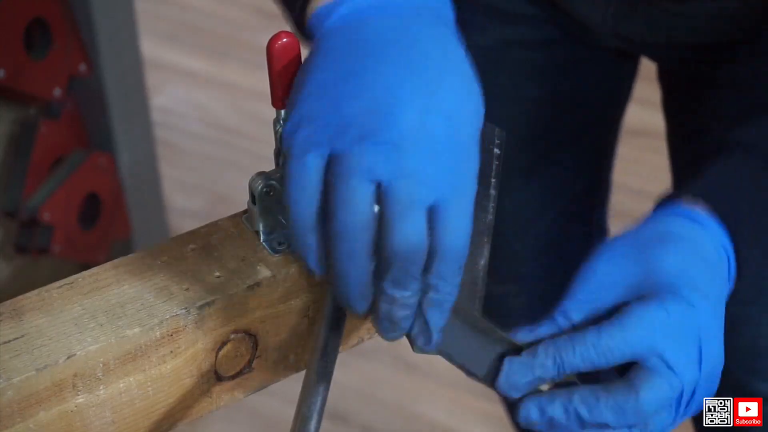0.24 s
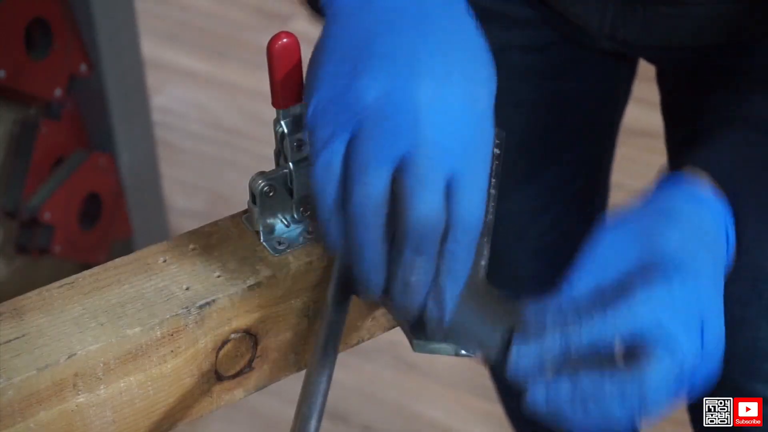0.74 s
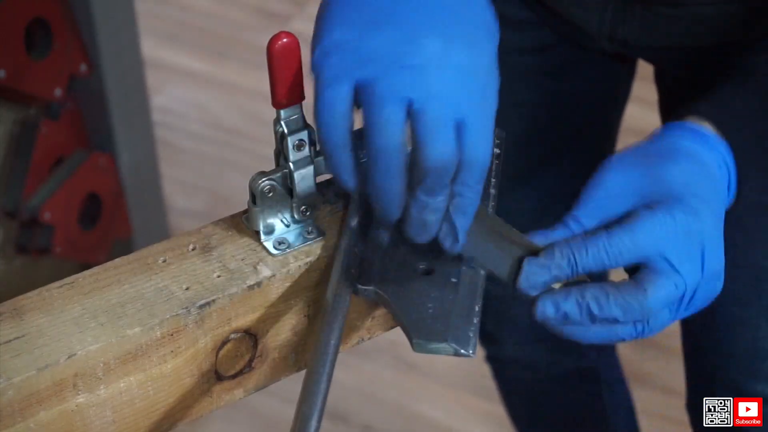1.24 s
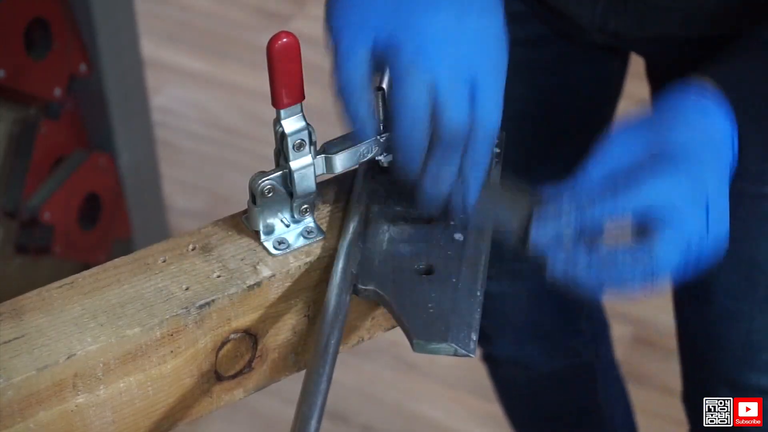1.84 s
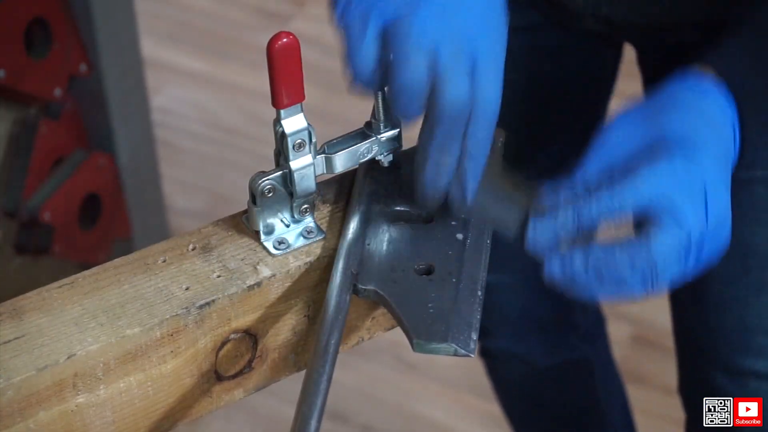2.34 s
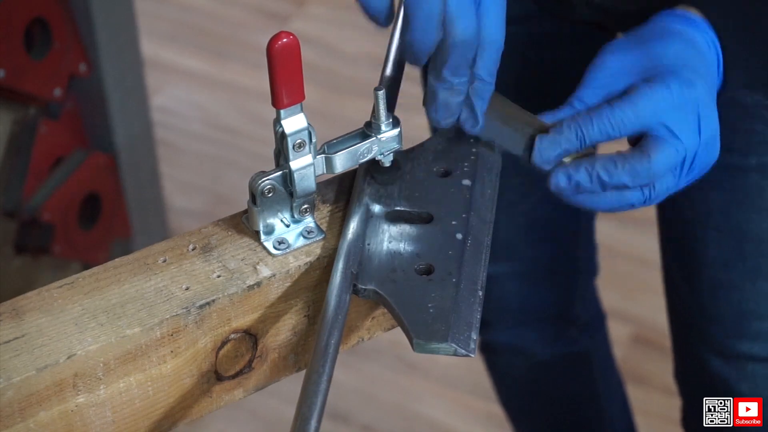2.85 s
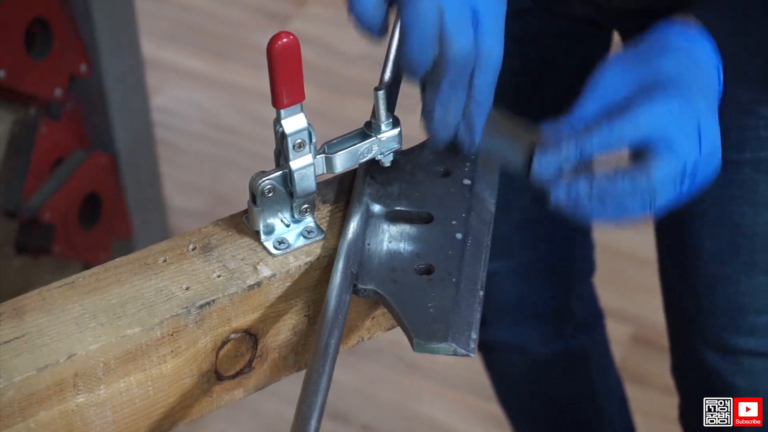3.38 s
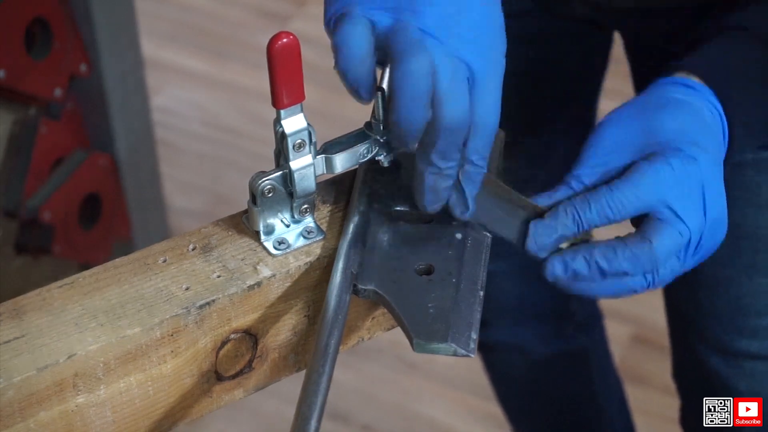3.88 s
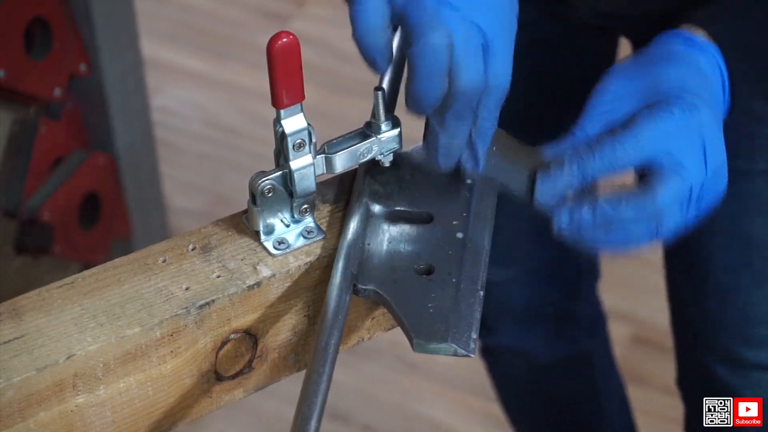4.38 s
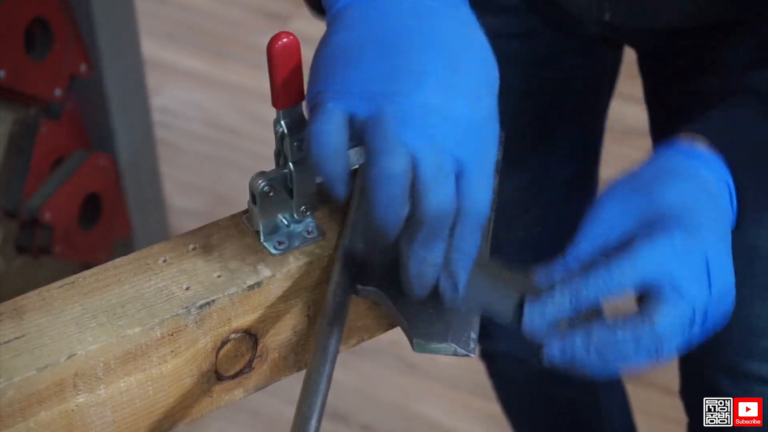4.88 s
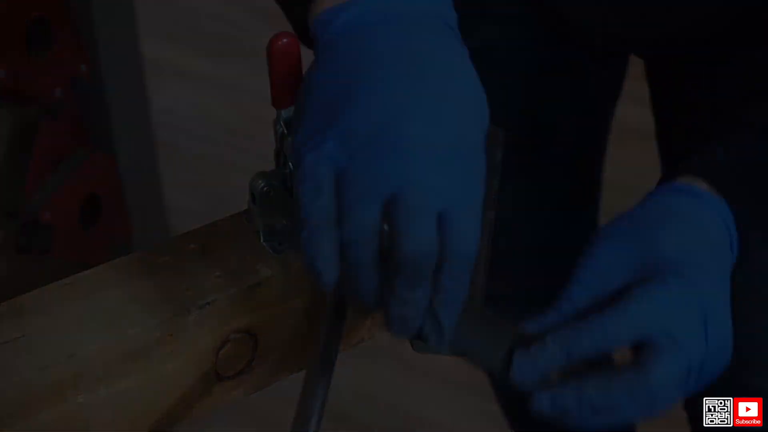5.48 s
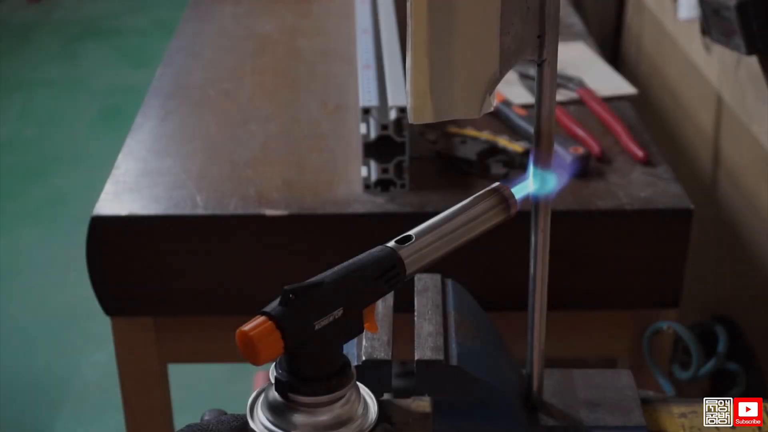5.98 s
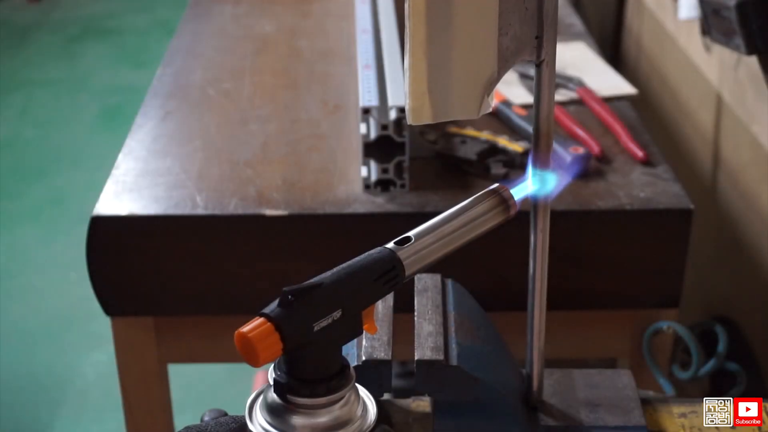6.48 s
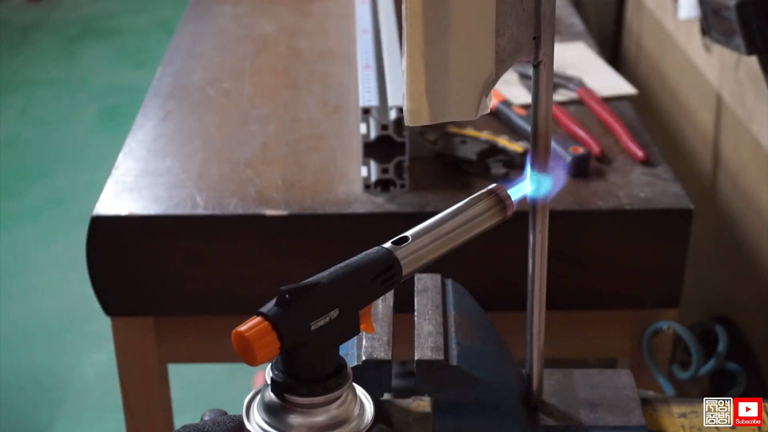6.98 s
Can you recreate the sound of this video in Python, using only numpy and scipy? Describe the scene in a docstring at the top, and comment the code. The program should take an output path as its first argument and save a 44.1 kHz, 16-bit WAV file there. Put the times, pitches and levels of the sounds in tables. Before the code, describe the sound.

In a quiet workshop, a stereo microphone picks up quick, even strokes of steel wool on clamped steel: a bright, scratchy fizz with a metallic ring, dipping at each turn of the hand. A few brief squeaks slip out while the wooden beam underneath drones faintly. Near the end this blends into another room, where a gas torch burns with a steady, slightly hollow roar.

```python
"""A fizzing, ringing scrub comes first: steel wool worked to and fro on a steel rod clamped to a wooden
beam, heard on a two-port stereo microphone in a quiet workshop. Snagging fibres fizz, ring the steel and
now and then squeak; each stroke falls away where the hand turns, and the beam drones underneath.
Near the end the workshop crossfades to another room, where a gas torch roars through the resonances."""
import sys
import numpy as np
from scipy import signal
from scipy.fft import rfft, irfft, next_fast_len
from scipy.io import wavfile
from scipy.ndimage import uniform_filter1d

SR = 44100
rng = np.random.default_rng(int(sys.argv[2]) if len(sys.argv) > 2 else 0)


def persist_wave(psi):
    """Save psi, clipped to +-1, as 16-bit WAV."""
    counts = np.round(np.clip(psi, -1, 1) * 32767).astype(np.int16)
    wavfile.write(sys.argv[1], SR, np.atleast_2d(counts).T)


N = 318830
PADDED = next_fast_len(N)


def gain_of(db):
    """Decibels to gain."""
    return 10 ** (np.asarray(db) / 20)


def unit_rms(x):
    """Scales to rms 1."""
    return x / np.sqrt(np.mean(x ** 2) + 1e-20)


def over_time(points):
    """A curve, sample by sample."""
    t, value = np.transpose(points)
    return np.interp(np.arange(N) / SR, t, value)


def over_hz(points):
    """Each column of a table, bin by bin, straight on a log axis."""
    f, *columns = np.transpose(points)
    log_bins = np.log(np.fft.rfftfreq(PADDED, 1 / SR) + 1)
    return [np.interp(log_bins, np.log(f + 1), column) for column in columns]


def colour(x, db):
    """Filters by a level in dB for each bin."""
    return irfft(rfft(x, PADDED) * gain_of(db), PADDED)[:, :N]


def wander(seconds):
    """Slow random drift of rms 1, shared by left and right."""
    size = max(round(seconds * SR), 2)
    return unit_rms(uniform_filter1d(uniform_filter1d(rng.standard_normal(N), size), size))


def resonate(x, hz, width_hz):
    """A resonance that follows the curve hz: shifts it down to zero, smooths, and shifts back."""
    carrier = np.exp(2j * np.pi * np.cumsum(hz) / SR)
    pole = np.exp(-np.pi * width_hz / SR)
    return 2 * (carrier * signal.lfilter([1 - pole], [1, -pole], x / carrier)).real


def microphone(pair, image):
    """Blends two unrelated versions of a sound into the left and right microphone ports."""
    likeness, lead, balance_db = over_hz(image)
    likeness = np.clip(likeness, 0, 1)
    left, other = rfft(pair, PADDED)
    right = (likeness * left + np.sqrt(1 - likeness ** 2) * other) * np.exp(-1j * lead)
    spectra = np.array([left * gain_of(balance_db / 2), right * gain_of(-balance_db / 2)])
    return irfft(spectra, PADDED)[:, :N]


def reflections(x, depth_db):
    """Reflections off hands, beam and walls cut a fine comb that shifts as the pad travels."""
    frames = signal.stft(x, nperseg=2048)[2]
    comb = uniform_filter1d(rng.standard_normal(frames.shape[1:]), size=2, axis=0)
    comb = unit_rms(uniform_filter1d(comb, size=5, axis=1))
    return unit_rms(signal.istft(frames * gain_of(depth_db * comb), nperseg=2048)[1][:, :N])


def snags(per_s, spread_db):
    """Fibres catch and let go: dense clicks of either sign, a few of them large."""
    chance, size, sign = rng.random((3, 2, N))
    size_db = spread_db * np.minimum(-np.log(size + 1e-9), 5)
    return unit_rms((chance < per_s / SR) * gain_of(size_db) * np.sign(sign - .5))


# strokes on the rod: start t/s, base level/dB, swell from middle to end/dB, ring over fizz/dB
STROKES = [(-0.1, -42, 1, -5), (0.039, -42.5, 0.5, -3), (0.186, -44, -0.5, -4), (0.33, -42, 0, -3),
           (0.469, -45.5, 1.5, -3.5), (0.609, -42, -0.5, -4.0), (0.743, -47.5, 1, -1.5),
           (0.883, -45, -1.5, -4), (1.023, -47, 2, -1), (1.16, -43.0, 1.5, -2.0), (1.327, -44.0, -2.5, -2),
           (1.471, -40.0, 2, -3.5), (1.642, -40.0, -3, -3.5), (1.792, -39.5, 0.5, -2),
           (1.976, -40.5, -1, -2), (2.124, -42, 0, 1.0), (2.311, -41.0, -2, 1), (2.461, -41.5, -1.5, 2),
           (2.627, -42.0, -0.5, 0.5), (2.769, -43.5, 1.5, 0.0), (2.926, -43, -2, 2),
           (3.063, -43.5, 2.5, 4.5), (3.211, -42.5, -2, 0.0), (3.352, -44.0, 1.5, 3.0),
           (3.502, -42, -2, 0.0), (3.642, -43.5, 2.0, 3.5), (3.791, -42.5, -0.5, 0.5), (3.95, -44, 0.5, 1),
           (4.104, -42.5, 0.5, 0), (4.267, -39, -0.5, 2), (4.417, -42.5, -0.5, -0.5),
           (4.588, -39.5, 1, 1.5), (4.739, -41.5, -3, -1.5), (4.914, -40.0, 1, -1), (5.065, -43.0, -2, -1),
           (5.238, -43, 1.5, -1.5), (5.388, -44.0, -2.5, -1), (5.542, -44.5, 1.0, -1.5),
           (5.687, -44.5, -1.5, -1), (5.847, -42.5, -2, -2)]
# fizz of fibres on steel: f/Hz, relative level/dB
FIZZ_SPECTRUM = [(60, -85), (300, -55), (1400, -20), (2000, -21), (2700, -15.5), (3400, -7.5), (4100, -2.5),
                 (4600, -11.5), (6800, -4.5), (8400, 2.5), (9300, 1), (10700, 3.5), (12000, -5)]
# centre of the ring as the grip moves along the rod: t/s, f/Hz
RING_CENTRE = [(0, 5250), (.5, 5000), (1.0, 5000), (1.4, 5360), (1.9, 5450), (2.15, 5850), (2.45, 5100),
               (2.8, 5150), (3.3, 5350), (3.75, 5200), (4.0, 5500), (4.3, 5800), (4.9, 5600), (5.4, 5260),
               (6.0, 5040)]
# how firmly the rod drives the plate: t/s, level/dB relative to the stroke
PLATE_DRIVE = [(0, -9.5), (1.0, -7.5), (1.6, -10), (2.3, -8.5), (3.0, -11), (4.0, -14.5), (4.4, -9),
               (5.0, -12.5), (6.0, -15)]
# the workshop at the microphone: f/Hz, left-right likeness, left lead/rad, left over right/dB
WORKSHOP_IMAGE = [(98, 1, 0.87, 2.5), (595, 0.72, -0.41, 1), (1390, 0.37, -0.8, 1.5), (2450, 0.44, -0.5, 2),
                  (3540, 0.19, 0.047, 1.5), (4400, 0.51, 0.023, 0), (5420, 0.79, 0.1, 3.5),
                  (6000, 0.8, -1.3, 5), (6560, 0.54, -0.085, 1), (8500, 0.69, -0.29, 1),
                  (11000, 0.93, -0.7, 2)]
def scrub():
    """Snags follow the hand's speed; they fizz and ring the steel in a band that moves with the grip."""
    last_turn_s, glide_hz = 6.0, 250
    starts, level_db, swell_db, ring_over_db = np.transpose(STROKES)
    turns, t = np.append(starts, last_turn_s), np.arange(N) / SR
    progress = np.interp(t, turns, np.arange(len(turns)))  # stroke count; fraction = way along it
    stroke = np.minimum(progress.astype(int), len(starts) - 1)
    along = 2 * (progress - stroke) - 1  # from -1 at one turn to 1 at the next
    arch = 1 - 2 * abs(along)
    press_db = uniform_filter1d(level_db[stroke], size=600)
    # the fizz sags along a stroke and arches in its middle; the ring swells more and dips there
    fizz_db = press_db + (swell_db[stroke] - 0.5) * along + 0.5 * arch
    ring_db = press_db + ring_over_db[stroke] + 1.33 * swell_db[stroke] * along - arch
    fizz_gain, ring_gain = uniform_filter1d(gain_of([fizz_db, ring_db]), size=400)
    ring_hz = over_time(RING_CENTRE) - glide_hz / 2 * along * (-1) ** stroke  # down one way, up the other
    # the pad bites quickly after a turn and slows more gently into the next
    since, until = t - turns[stroke], abs(turns[stroke + 1] - t)
    speed = 0.34 + np.tanh(since / 0.029) * np.tanh(until / 0.033)  # the floor stands for echoes
    bite = (np.tanh(since / 0.012) * np.tanh(until / 0.02)) ** 2
    fizz = colour(snags(per_s=14000, spread_db=2.3), over_hz(FIZZ_SPECTRUM)[0])
    fizz = reflections(fizz, depth_db=4.3) * fizz_gain * speed
    ring = resonate(snags(per_s=9000, spread_db=2.7), ring_hz, width_hz=2120)
    ring = reflections(resonate(ring, ring_hz, width_hz=2100), depth_db=3.3) * ring_gain
    ring = colour(ring, over_hz([(1500, -45), (3300, -3.0), (4000, -1)])[0])  # steep on its low side
    # the heavy plate rings on through each turn more than the rod does
    plate_gain = gain_of(press_db + over_time(PLATE_DRIVE))
    steel = ring * (0.28 + bite) + plate() * plate_gain * (0.93 + bite)
    flicker = gain_of(0.6 * wander(0.018))
    return microphone((fizz + steel) * flicker + squeaks(), WORKSHOP_IMAGE)


# modes of the rod and clamped plate: f/Hz, width/Hz, relative level/dB
STEEL_MODES = [(2016, 380, 0.5), (2310, 120, -1.5), (2636, 240, 2), (2980, 68, -2), (4120, 300, 9),
               (4433, 55, 4), (4765, 51, 2), (6050, 420, 4.5)]
# thin steel radiates little bass: f/Hz, relative level/dB
STEEL_RADIATION = [(1200, -38), (1950, -15)]
def plate():
    """Snags ring the steel's modes, each swelling and fading as the pad covers other spots."""
    drive = snags(per_s=6000, spread_db=3.4)
    modes = sum(gain_of(db + 2.5 * wander(0.054)) * unit_rms(resonate(drive, np.full(N, hz), width))
                for hz, width, db in STEEL_MODES)
    return unit_rms(colour(modes, over_hz(STEEL_RADIATION)[0]))


# room tone of the workshop: f/Hz, relative level/dB
AIR_SPECTRUM = [(24, -50), (60, -40), (100, -32), (145, -13.5), (200, -5.5), (260, -5), (310, 0), (450, -1),
                (800, -5), (1400, -9.5), (2300, -36), (5000, -25)]
# wooden beam under the rod: f/Hz, relative level/dB
BEAM_SPECTRUM = [(200, -31), (450, -9), (700, 2), (910, 5), (1050, 1.5), (1250, -4.5), (1650, -4),
                 (2100, -4.5), (3400, -0.5), (5000, -26)]
# the beam's drone: t/s, level/dB
BEAM_LEVEL = [(0, -56), (1.2, -55.5), (2.4, -53.5), (4.8, -50)]
def air_and_beam():
    """Still air, and the beam's broad resonance, which grows as the pad moves along the rod."""
    air = unit_rms(colour(rng.standard_normal((2, N)), over_hz(AIR_SPECTRUM)[0]))
    beam = unit_rms(colour(rng.standard_normal((2, N)), over_hz(BEAM_SPECTRUM)[0]))
    air_db = -60 + .7 * wander(.08)
    beam_db = over_time(BEAM_LEVEL) + .7 * wander(.05)
    air = reflections(air, depth_db=3.2) * gain_of(air_db)
    return microphone(air + beam * gain_of(beam_db), WORKSHOP_IMAGE)


# fibres that sing for a moment: middle t/s, f/Hz, peak level/dB, half length/s
SQUEAKS = [(0.57, 4040, -44, 0.018), (0.663, 5300, -47, 0.0103), (1.56, 4100, -60, .05),
           (1.701, 4100, -54, 0.022), (2.025, 5580, -40, 0.032), (4.345, 6180, -37, 0.023),
           (5.003, 4260, -44, 0.019)]
def squeaks():
    """Short narrow whistles of stick and slip."""
    out = np.zeros((2, N))
    width_hz = 140
    for middle_s, hz, db, half_s in SQUEAKS:
        t = np.arange(-3 * half_s, 3 * half_s, 1 / SR)
        pitch = np.full(len(t), hz)
        friction = rng.standard_normal((2, len(t)))
        whistle = unit_rms(resonate(resonate(friction, pitch, width_hz), pitch, width_hz))
        start = round((middle_s + t[0]) * SR)
        out[:, start:start + len(t)] += gain_of(db) * whistle * np.exp(-(t / half_s) ** 2)
    return out


# roar of the flame: f/Hz, relative level/dB
ROAR_SPECTRUM = [(24, -70), (60, -49), (110, -41), (160, -23.5), (268, -14.5), (483, -3), (737, -4.5),
                 (955, -8.5), (1210, -7.5), (1930, -11), (3000, -17.5), (4300, -24), (4830, -22),
                 (5700, -31.5), (7730, -31.5), (11000, -41)]
# standing waves and burner tube lift the roar, cancelling echoes notch it: f/Hz, width/Hz, lift/dB
ROOM_MODES = [(334, 23, 7.5), (393, 35, -8), (492, 15, -2), (644, 16, -7), (824, 20, -13), (955, 43, -7),
              (1280, 20, -7), (475, 21, 5.5), (593, 100, 3.5), (705, 18, 1), (742, 15, 11), (856, 26, 5),
              (1125, 59, 4.5), (1228, 27, 6.5), (1331, 80, 6.5), (1466, 7.2, 10.5), (1596, 23, 10),
              (1786, 150, 7), (1962, 76, 7.5), (2240, 91, 7), (2514, 53, 9), (2680, 24, 12.5),
              (2940, 21, 10.5), (3274, 38, 8.5), (3840, 150, 4), (5390, 270, 8), (7820, 520, 8),
              (10300, 410, 10)]
# the torch at the microphone: f/Hz, left-right likeness, left lead/rad, left over right/dB
TORCH_IMAGE = [(100, 0.98, -0.34, 2.5), (760, 0.93, 0.24, -0.8), (1060, 0.72, -0.63, 4.5),
               (1330, 0.89, 0.45, -1), (1630, 0.91, -1.4, 4.5), (2020, 0.91, -0.72, -1),
               (2750, 1, -1.06, -1), (3400, 0.16, -0.78, -2), (4500, 0.74, -0.48, 0),
               (6600, 0.36, -0.6, 2.5), (7500, 0.63, -.4, 1), (11000, 0.44, -0.29, 3)]
def torch(level_db=-30.5):
    """Turbulent burning flutters a little and reaches the microphone through the room's resonances."""
    hz = np.fft.rfftfreq(PADDED, 1 / SR)
    lift_db = sum(db / (1 + (2 * (hz - f) / width) ** 2) for f, width, db in ROOM_MODES)
    burning = rng.standard_normal((2, N)) * gain_of(0.48 * wander(0.013) + 0.11 * wander(0.13))
    roar = unit_rms(colour(burning, over_hz(ROAR_SPECTRUM)[0] + lift_db))
    return microphone(roar * gain_of(level_db), TORCH_IMAGE)


def scene():
    """An equal-power crossfade leads from the workshop to the torch's room."""
    fade_start_s, fade_length_s = 5.195, 0.98
    angle = np.pi / 2 * np.clip((np.arange(N) / SR - fade_start_s) / fade_length_s, 0, 1)
    return (scrub() + air_and_beam()) * np.cos(angle) + torch() * np.sin(angle)


def record(dry, cutoff_hz=11030):
    """A steep low-pass takes the top treble off both microphone channels."""
    low_pass = signal.firwin(1023, cutoff_hz, window=("kaiser", 8), fs=SR)
    return signal.oaconvolve(dry, low_pass[None], "same")


dry = scene()
out = record(dry)
persist_wave(out)
```